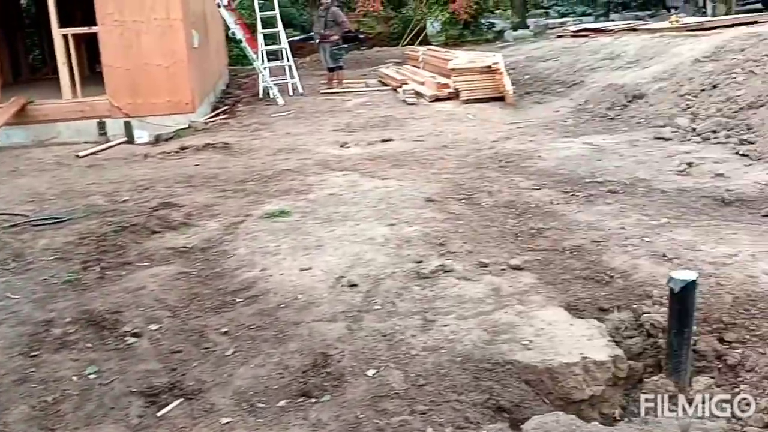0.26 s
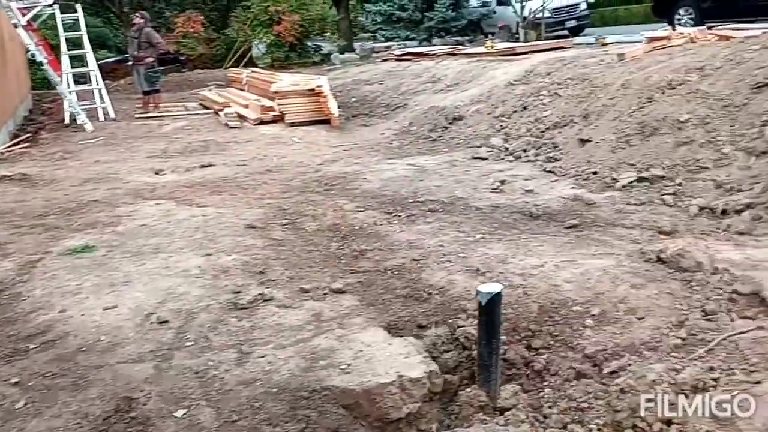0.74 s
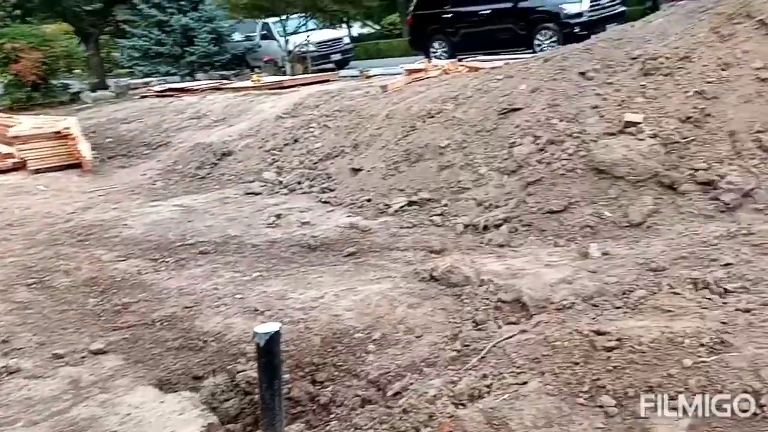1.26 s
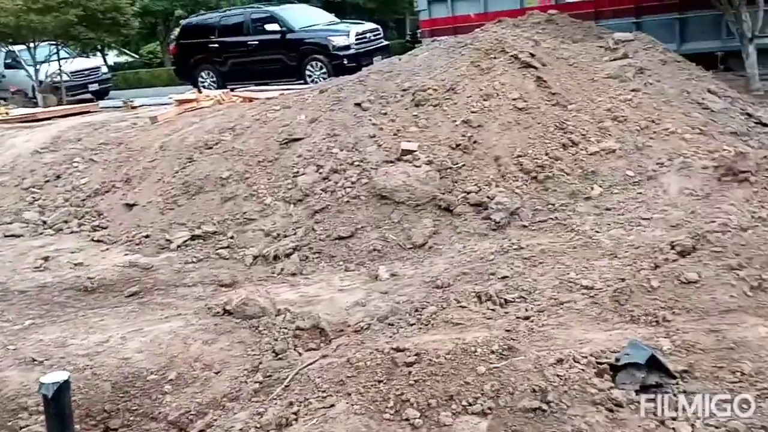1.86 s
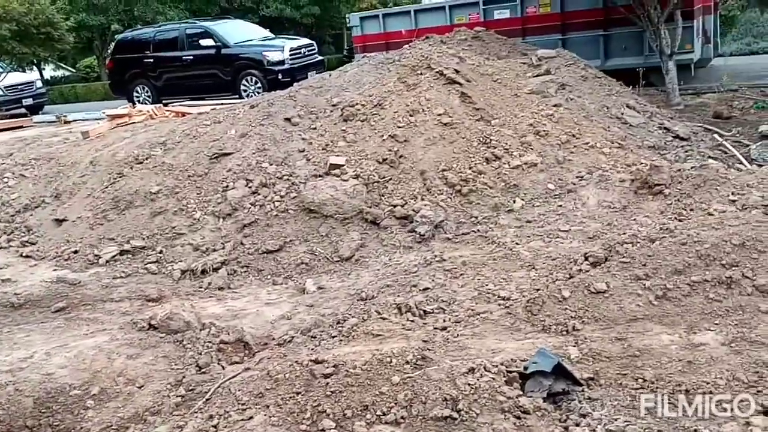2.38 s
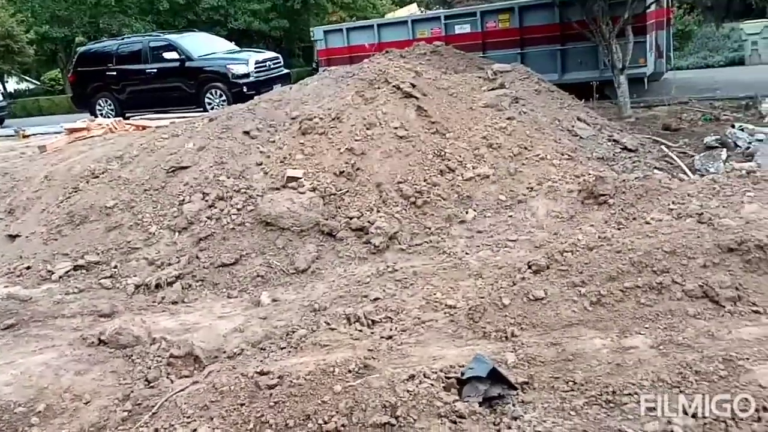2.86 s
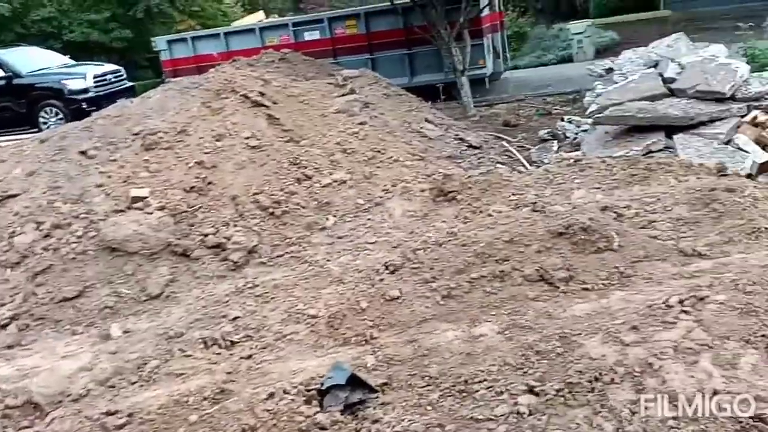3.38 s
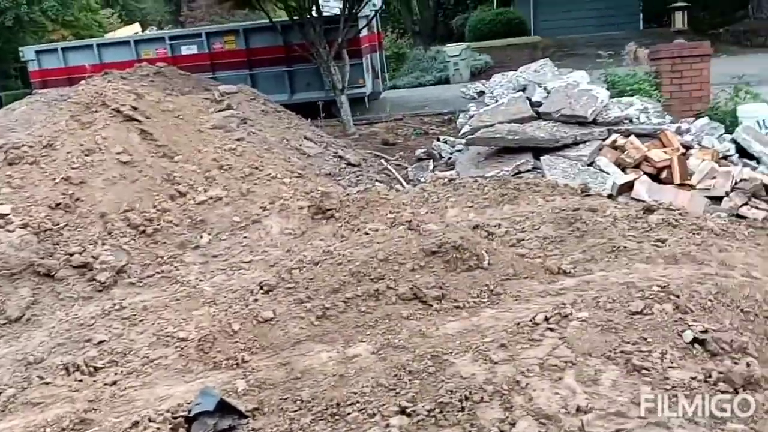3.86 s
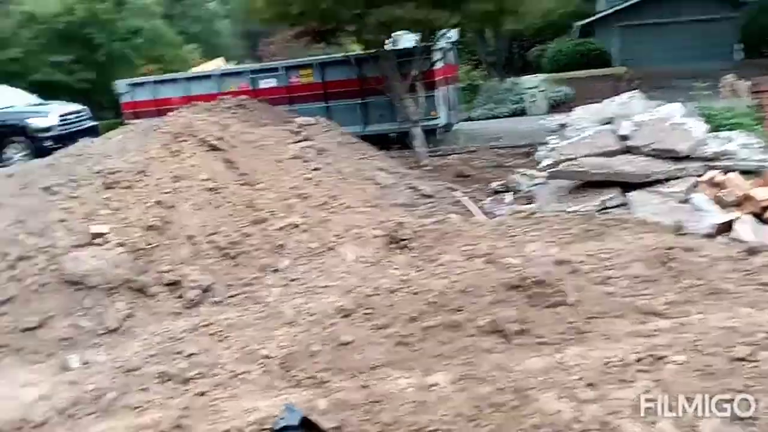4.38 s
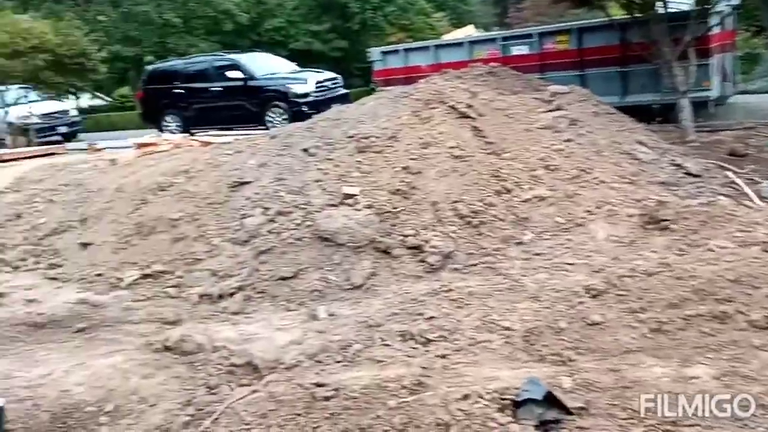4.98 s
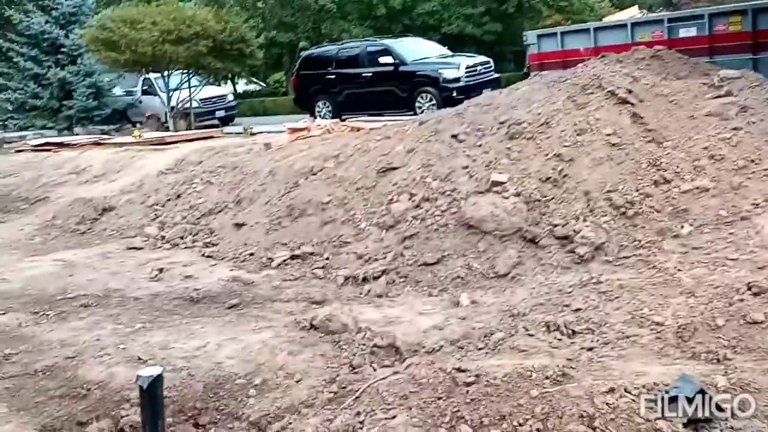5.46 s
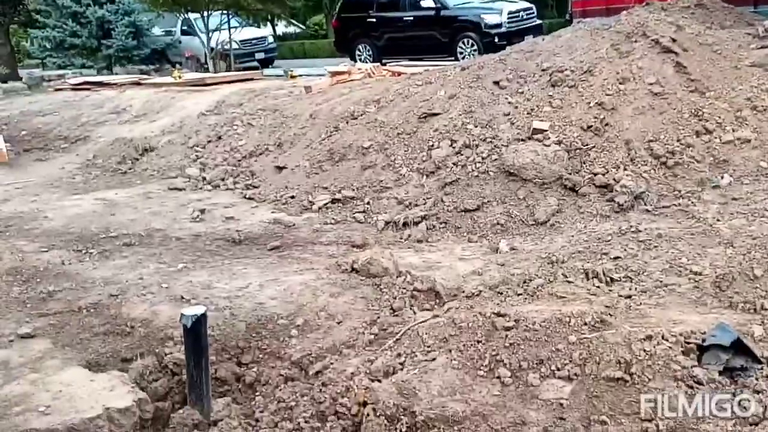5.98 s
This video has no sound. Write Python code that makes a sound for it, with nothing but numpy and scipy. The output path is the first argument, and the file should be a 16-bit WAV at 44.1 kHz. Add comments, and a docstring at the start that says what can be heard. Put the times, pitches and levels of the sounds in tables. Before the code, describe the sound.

Two sharp nail gun shots ring across an outdoor work site, with a board slam, tool knocks, hollow rubbing and faint squeaks around them.

```python
"""An open building site, heard through a hand-held phone: a nail gun fires twice, a ring of decaying
tones under a rising snap. Tools knock and boards thud off to the right as bursts of banded noise, and
walls and trees send each blow back as a long wash. Behind them lie a wavering noise bed, dry rustles,
a rubbed hollow body (noise through a resonance) and faint squeaks (rough gliding tones).
Fingers tick and bump on the phone: short falling chirps and soft low swings."""
import sys
import numpy as np
from scipy import signal
from scipy.fft import rfft, irfft, next_fast_len
from scipy.io import wavfile
from scipy.ndimage import uniform_filter1d

SR = 44100
rng = np.random.default_rng(int(sys.argv[2]) if len(sys.argv) > 2 else 0)


def wav_out(sig):
    """Save sig, one row per channel (or a flat mono array), as 16-bit PCM at SR to the path in sys.argv[1]."""
    wavfile.write(sys.argv[1], SR, np.round(np.clip(np.atleast_2d(sig).T, -1, 1) * 32767).astype(np.int16))


N = 274743
LAG_S = 23 / SR  # the left port hears the site later


def undb(db):
    """Decibels to amplitude."""
    return 10 ** (np.asarray(db) / 20)


def along(hz, table):
    """Columns of a table read on a log-frequency axis."""
    rows = np.array(table, float)
    return [np.interp(np.log(hz), np.log(rows[:, 0]), column) for column in rows.T[1:]]


def walk(rate, size=N):
    """Random levels held for 1 / rate s and smoothed twice; spread 1."""
    hold = int(SR / rate)
    steps = np.repeat(rng.standard_normal(size // hold + 8), hold)
    smooth = uniform_filter1d(uniform_filter1d(steps, hold), hold)
    return smooth[:size] / smooth.std()


def ring_modes(t, modes, turns):
    """Sum of decaying sine modes (pitch_hz, level_db, t60_s), each started at its own phase in turns."""
    return sum(undb(db) * np.sin(2 * np.pi * (hz * t + turn)) * 1000 ** (-t / t60)
               for (hz, db, t60), turn in zip(modes, turns))


def add(out, s, sound, pan_db=0., lag_s=0.):
    """Mixes a short sound into both channels; positive pan leans left, the lag delays the left."""
    for c, sign in enumerate((1, -1)):
        i = int((s + lag_s * (1 - c)) * SR)
        out[c, i:i + len(sound)] += sound[:N - i] * undb(sign * pan_db / 2)


# colour of the microphone: pitch_hz [Hz], level_db [dB]
MIC = [(30, -15), (60, -9.5), (110, 1), (250, -3.5), (550, -2.5), (950, 1), (1400, -3), (1900, -1.5),
       (2400, -2), (2750, -5), (3200, -5.5), (3800, -5), (4800, -2.5), (6000, 1.5), (7600, -5.5),
       (9500, -5), (12000, -4.5), (15000, -2)]
RIPPLE_DB, RIPPLE_HZ = 2.5, 24.97  # spread of the ripple, spacing of its knots
PORTS_M = 0.24  # spacing of the ports in the all-round field


def band_noises():
    """Third-octave noise at the two ports, rms 1: a wave that reaches the left late, and a field from all sides."""
    n = next_fast_len(N)
    f = np.fft.rfftfreq(n, 1 / SR) + 1e-3
    mic = undb(along(f, MIC)[0])  # the colour of the microphone also slopes each band
    # a fixed random ripple makes some pitches of all the noise stronger
    knots = np.arange(0, SR / 2 + RIPPLE_HZ, RIPPLE_HZ)
    ripple = np.interp(f, knots, rng.standard_normal(len(knots)))
    mic = mic * undb(RIPPLE_DB * ripple)
    shared, mid, side = rfft(rng.standard_normal((3, n)))
    wave = np.array([shared * np.exp(-2j * np.pi * f * LAG_S), shared])
    alike = np.sinc(2 * f * PORTS_M / 343)  # long waves are the same at both ports
    mid, side = mid * np.sqrt(1 + alike), side * np.sqrt(1 - alike)
    field = np.array([mid + side, mid - side])
    for hz in 23.5 * 2 ** np.arange(0, 9.5, 1 / 3):
        mask = np.cos(np.pi / 2 * np.clip(3 * np.log2(f / hz), -1, 1)) * mic
        late = irfft(mask * wave, n)[:, :N]
        loose = irfft(mask * field, n)[:, :N]
        yield hz, late / late.std(), loose / loose.std()


# spectrum of the distant noise: pitch_hz [Hz], density_db [dB per Hz, relative]
SITE = [(15, -39), (25, -6), (120, -6.5), (451, -17), (840, -5.5), (1480, -11.5), (1700, -10),
        (2910, -21.5), (5730, -28), (8140, -40.5), (13600, -48.5), (14800, -40), (16000, -41.5)]
# swells of the distant noise: time_s [s], bass_db [dB], treble_db [dB]
BUSTLE = [(0, -60.5, -58.5), (.3, -57.5, -61.5), (.7, -62, -56.5), (1.1, -46.5, -60), (1.4, -59.5, -64),
          (1.8, -48, -59), (2.1, -60, -60.5), (3.3, -58.5, -59), (4.5, -60, -61.5), (4.851, -54, -61.5),
          (5.1, -61, -65), (5.45, -56, -57.5), (5.75, -57.5, -60.5), (6.0, -60, -64.5), (6.23, -55.5, -63)]


def bustle(hz):
    """Level of the distant noise in one band: slow swells with a quick random waver."""
    s, bass_db, treble_db = np.transpose(BUSTLE)
    treble = np.clip(np.log2(hz / 300) / 1.1, 0, 1)
    swell = np.interp(np.arange(N) / SR, s, bass_db + treble * (treble_db - bass_db))
    band_db = along(hz, SITE)[0] + 10 * np.log10(hz / 1260)  # wider bands hold more noise
    return undb(band_db + swell + 4.1 * walk(22))


# dry rustles: start_s [s], length_s [s], level_db [dB], centre_hz [Hz], width_oct [octaves]
RUSTLES = [(0.11, 0.46, -69.5, 6420, 0.13), (5.09, 0.4, -60.5, 785, 0.25), (5.4, 1, -66, 860, 0.16),
           (5.503, 0.17, -67, 2170, 0.65)]


def rustles(hz, floor):
    """Arched bursts of noise around a centre pitch, added in power to the level of the band."""
    t = np.arange(N) / SR
    for s, length, db, centre_hz, octaves in RUSTLES:
        arch = np.sin(np.pi * np.clip((t - s) / length, 0, 1)) ** .5
        floor = np.hypot(floor, undb(db) * arch * np.exp(-(np.log2(hz / centre_hz) / octaves) ** 2))
    return floor


# something hollow dragged or rubbed: start_s [s], length_s [s], start_db [dB], end_db [dB]
STROKES = [(0.248, 0.073, -56, -69), (0.37, 0.31, -47, -55), (0.721, 0.11, -56, -56),
           (0.888, 0.19, -66, -54), (1.965, 0.14, -51, -42.5), (2.162, 0.3, -57, -53),
           (3.157, 0.24, -61, -46.5), (3.398, 0.12, -51.5, -46), (3.595, .06, -44, -50),
           (4.72, 0.11, -54.5, -55.5), (5.009, .08, -50.5, -65), (5.58, 0.049, -53, -61)]
STROKE_ATTACK_S, STROKE_RELEASE_S = 0.031, 0.11
HOLLOW_HZ, HOLLOW_WIDTH_HZ = 337, 71


def hollow_rub(out):
    """Uneven slips shake a hollow body that rings for a few cycles."""
    t = np.arange(N) / SR
    slips = rng.standard_normal(N) * undb(1.6 * walk(65))
    edges = [HOLLOW_HZ - HOLLOW_WIDTH_HZ / 2, HOLLOW_HZ + HOLLOW_WIDTH_HZ / 2]
    body = signal.sosfilt(signal.butter(2, edges, "band", fs=SR, output="sos"), slips)
    power = np.zeros(N)
    for s, length, start_db, end_db in STROKES:
        attack = (t - s) / STROKE_ATTACK_S
        release = 1 + (s + length - t) / STROKE_RELEASE_S
        press = np.clip(np.minimum(attack, release), 0, 1)
        power += (press * undb(np.interp(t, [s, s + length], [start_db, end_db]))) ** 2
    add(out, 0, np.sqrt(power) * body / body.std(), .6, 0.45 * LAG_S)


# a squeak that returns about twice a second: start_s [s], level_db [dB], upper_strand_db [dB]
SQUEAKS = [(0.06, -51, -69.5), (0.615, -48, -64.5), (1.17, -48, -67.5), (1.759, -46, -68.5)]
# glide of that squeak: length_s [s], start_hz [Hz], end_hz [Hz]
SQUEAK = (0.077, 1390, 1330)
STRAND = (0.14, 1800, 1900)  # its upper strand, same columns
STRAND_LATE_S = 0.064
# lone squeaks: start_s [s], level_db [dB], length_s [s], start_hz [Hz], end_hz [Hz]
STRAYS = [(0.108, -64.5, 0.12, 560, 558), (0.186, -57.5, 0.096, 1385, 1347),
          (0.295, -66, 0.046, 1630, 1960), (0.315, -55, 0.12, 2015, 1990), (0.376, -55, 0.16, 1910, 1555),
          (1.3, -54.5, 0.056, 1573, 1390), (1.391, -70, 0.17, 2285, 2650), (1.599, -59.5, 0.2, 2460, 2400),
          (1.853, -63, 0.049, 2930, 3440), (1.886, -55.5, 0.038, 1515, 1465),
          (1.869, -68, 0.18, 3440, 3270), (4.335, -54, 0.049, 3540, 3290),
          (4.373, -63.5, 0.036, 2930, 3080)]
# a thin steady tone: start_s [s], level_db [dB], length_s [s]
PINGS = [(5.374, -54, 0.11), (5.801, -70, 0.22)]
PING_HZ = 2417
SQUEAK_WOBBLE_HZ, STRAND_WOBBLE_HZ, PING_WOBBLE_HZ = 28, 70, 4
BREATH_HZ = 30  # wobble at which the breathy part is as big as the tone
BREATH_PER_S = 300  # changes of the breathy part per second
SQUEAK_ECHO_DB, STRAY_ECHO_DB, PING_ECHO_DB, SQUEAK_T60_S = -35.5, -37, -38.5, 0.52


def squeaks(out):
    """Short rough whistles from afar, smeared by the echo of the site, a decaying noise tail."""
    t = np.arange(SR // 2) / SR
    calls = [(s, db, *SQUEAK, SQUEAK_WOBBLE_HZ, SQUEAK_ECHO_DB) for s, db, _ in SQUEAKS]
    calls += [(s + STRAND_LATE_S, db, *STRAND, STRAND_WOBBLE_HZ, SQUEAK_ECHO_DB) for s, _, db in SQUEAKS]
    calls += [(*row, SQUEAK_WOBBLE_HZ, STRAY_ECHO_DB) for row in STRAYS]
    calls += [(*row, PING_HZ, PING_HZ, PING_WOBBLE_HZ, PING_ECHO_DB) for row in PINGS]
    for s, db, length, hz0, hz1, wobble, echo_db in calls:
        u = np.linspace(0, 1, int(length * SR))
        hz = hz0 + (hz1 - hz0) * u + wobble * walk(139, size=len(u))
        blur = walk(BREATH_PER_S, size=len(u)) + 1j * walk(BREATH_PER_S, size=len(u))
        breath = 1 + wobble / BREATH_HZ * blur  # spreads the line
        whistle = np.imag(breath * np.exp(2j * np.pi * np.cumsum(hz) / SR))
        tone = np.sin(np.pi * u ** 0.6) * undb(db) * whistle
        add(out, s, tone, 2.2, LAG_S)
        i = int(s * SR)
        for c in range(2):
            wash = rng.standard_normal(len(t)) * 1000 ** (-t / SQUEAK_T60_S)
            tail = signal.fftconvolve(tone, wash)
            out[c, i:][:len(tail)] += undb(echo_db) * tail[:N - i]


# finger ticks on the case: start_s [s], level_db [dB], start_hz [Hz], end_hz [Hz], cycles [count],
# left_minus_right_db [dB], ring_db [dB against the tick]
TICKS = [(3.0205, -24, 1500, 340, 1.4, 1.5, -36), (5.205, -42, 5750, 3460, 7.5, -10, -10),
         (5.323, -21.5, 2570, 920, 2.33, 15, -16), (5.358, -38.5, 3060, 1210, 2.2, 12, -3.5),
         (5.366, -41, 1400, 700, 2.1, 30, -22), (6.043, -54, 2280, 1390, 7.4, 2, -20),
         (6.063, -54, 1900, 1450, 7.8, 7.5, -18)]
# modes of the case: pitch_hz [Hz], level_db [dB], t60_s [s]
CASE = [(1090, 11.5, 0.0075), (1790, 7, 0.012), (2380, 1, 0.012), (2890, 0.5, 0.012), (4340, -18, 0.0088),
        (6730, 6.5, 0.0032)]


def finger_ticks(out):
    """A few cycles that drop in pitch, grit, and a short ring of the case."""
    t = np.arange(SR // 30) / SR
    for s, db, hz0, hz1, cycles, pan, ring_db in TICKS:
        u = np.linspace(0, 1, int(cycles * SR / np.sqrt(hz0 * hz1)))
        swing = np.sin(2 * np.pi * np.cumsum(hz0 * (hz1 / hz0) ** u) / SR)
        grit = 0.22 * undb(ring_db) * rng.standard_normal(len(u)) * np.exp(-u / 0.23)
        add(out, s, undb(db) * (np.sin(np.pi * u ** 0.66) ** 2 * swing + grit), pan)
        ring = ring_modes(t, CASE, rng.random(len(CASE)))
        add(out, s, undb(db + ring_db) * ring * (1 - np.exp(-t / 0.00021)), pan)


# hand bumps: start_s [s], level_db [dB], pitch_hz [Hz], left_minus_right_db [dB]
BUMPS = [(3.183, -47, 84, 4.5), (4.698, -46.5, 79, -26.5), (4.73, -36.5, 91, -34), (4.755, -35, 122, -21.5),
         (4.858, -53, 147, -16), (4.874, -43, 103.5, 8), (4.919, -57.5, 78.1, 18.5),
         (5.255, -49.5, 95, -22), (5.28, -57, 114, -16), (5.431, -49, 119, -14), (5.605, -52, 84, -34),
         (5.649, -45.5, 112, -29), (5.85, -69, 137.4, -3.5)]


def hand_bumps(out):
    """A soft low swing of 2.2 cycles under a rounded envelope."""
    for s, db, hz, pan in BUMPS:
        length = 2.2 * SR / hz
        u = np.arange(int(length)) / length
        add(out, s, -undb(db) * np.sin(np.pi * u) ** 2 * np.sin(2 * np.pi * 2.2 * u), pan)


# far blows, one table per kind: start_s [s], crack_db [dB at 1.7 kHz, before the colour of the kind],
# tilt_db [dB per octave], echo_db [dB], left_minus_right_db [dB]
SLAMS = [(1.554, -36.5, 0, -9, 0)]
# modes of the board: pitch_hz [Hz], level_db [dB], t60_s [s]
BOARD = [(103.5, 2, 0.22), (164, 0, 0.23), (213.5, -4, 0.49), (269, -6.5, 0.45), (308, -5, .3),
         (610, -9, 0.19), (835, -11, .1)]
BOARD_DB, BOUNCE_S, BOUNCE_DB = -29.5, .033, -2  # the slammed board lands twice


def board(out):
    """A slammed board knocks twice and rings low."""
    t = np.arange(SR // 2) / SR
    for s, *_ in SLAMS:
        for late_s, db in ((0, BOARD_DB), (BOUNCE_S, BOARD_DB + BOUNCE_DB)):
            ring = ring_modes(t, BOARD, rng.random(len(BOARD)))
            add(out, s + late_s, undb(db) * ring * (1 - np.exp(-t / 0.0021)), 0., LAG_S)


# the other kinds of far sound, same columns as SLAMS
NAILS = [(2.4405, -14, -0.5, -7.5, 0.5), (3.677, -12, -0.84, -10, -0.5)]
# noise that swells up just before a blow, same columns
SWELLS = [(2.104, -49, -1.5, -6.5, 0), (2.422, -29.5, 0.29, -4.5, 0), (3.375, -45.5, -0.59, -10.5, 0.0032)]
# presses, clinks, thuds and knocks, same columns
PRESSES = [(2.122, -36.5, -1, -13, 1.5), (3.395, -35, -1.5, -21, -1), (5.356, -54.5, 2.5, -22, -2)]
CLINKS = [(1.556, -67.5, 3.5, -9.5, 2), (2.171, -38.5, -3, -15, -2), (3.501, -46.5, -1.5, -25, -1),
          (3.658, -40.5, -2, -14, 0.5), (4.86, -71, -1.5, -8, 5), (5.139, -63.5, 0.5, -8, -17.5)]
THUDS = [(.909, -60.5, -3, -5, 0), (1.13, -94, -8, -10.5, 0), (1.29, -73.5, -4, -39, 0.0044),
         (3.46, -73, -4, -7.5, 0), (3.885, -56, -4, -18, 0)]
KNOCKS = [(.455, -48, 2.5, 3, 4.5), (.825, -58, -4.5, -10.5, 24), (.955, -60, 9, 9, 2.5),
          (2.123, -44, 7, -1.5, 4), (2.4305, -36, -10, -33, 20.5), (3.397, -38, -4, -15, 1),
          (3.503, -46, 2, -8, 1), (5.184, -37.5, 3, -13, 1.5), (5.209, -44.5, -4, -7.5, 0),
          (5.919, -61.5, 9.5, -9.5, 12), (6.174, -63, 3, -12, -2.5)]
# pitches at which the colour of a kind is given: pitch_hz [Hz]
BLOW_HZ = [55, 130, 500, 1700, 4500, 12000]
# what a kind shares: blows [table], colour_db [dB at BLOW_HZ], rise_s [s, lengthened in the bass],
# crack_t60_s [s, lengthened in the bass], echo_length [share of full]
KINDS = [
    (NAILS, (-30, -32, -14.5, 1, -4.5, -13), 0.0043, 0.073, 0.97),
    (SWELLS, (-27, -29, -2.5, -0.5, 9, 0), .045, 0.06, 0.52),
    (PRESSES, (-23, -23, -7.5, -1.5, 0.5, -5.5), 0.0018, 0.048, 0.59),
    (CLINKS, (-8.5, -10.5, -5.5, 0.5, 16.5, -16.5), 0.00082, 0.034, 0.44),
    (THUDS, (-3, 11, 1.5, 3, -19, -23), 0.003, 0.13, 0.53),
    (SLAMS, (-10, -1, 2.5, -5, -25, -40), 0.0015, 0.14, 0.53),
    (KNOCKS, (-40.5, -48, -21.5, 2, -15, -57.5), 0.0026, 0.061, 0.41),
]
# echo of the site at full length: pitch_hz [Hz], level_db [dB], hold_s [s], t60_s [s]
ECHO = [(49, -10.5, 0.59, 1.4), (137, 9.5, 0.18, 1.1), (250, 3, 0.3, 0.74), (393, 3.5, 0.25, 0.83),
        (560, 2.5, 0.28, 0.97), (810, -4.5, 0.21, 0.85), (1030, -4.5, 0.29, 1.026), (1610, -2, 0.22, 1.094),
        (2860, -4.5, 0.15, 1.12), (4066, -5.5, 0.13, 1.02), (6600, -1, 0.1, 0.75), (11300, -1.5, 0.2, 0.19)]
ECHO_RISE_S = 0.034  # at full length, slower in the bass
TILT_HZ = 1700  # pivot of the tilt
HOP = 32  # samples per envelope step


def blows(hz):
    """Envelopes in one band: the dry cracks and swells, and their echoes that build, hold and die away."""
    t = np.arange(N // HOP + 1) * HOP / SR
    echo_db, full_hold, t60 = along(hz, ECHO)
    mic_db = along(hz, MIC)[0]
    dry, wet = np.zeros((2, 2, len(t)))  # powers
    for rows, colour, rise, crack, share in KINDS:
        colour_db = mic_db + np.interp(np.log(hz), np.log(BLOW_HZ), colour)
        hold = full_hold * share ** 2  # small blows wake only the near walls
        for s, db, tilt, send_db, pan in rows:
            sides_db = pan * np.array([[.5], [-.5]])
            gain = undb(db + colour_db + tilt * np.log2(hz / TILT_HZ) + sides_db)
            age = np.maximum(t - s, 0)
            # low tones start slower and ring longer
            onset = (1 - np.exp(-age / (rise + 1.5 / hz))) ** 2
            dry += (gain * onset * 1000 ** (-age / (crack + 12 / hz))) ** 2
            build = 1 - np.exp(-(age / (ECHO_RISE_S * share + 4 / hz)) ** 2)
            past = np.cbrt(age ** 3 + hold ** 3) - hold  # stays near zero during the hold
            wet += (gain * undb(send_db + echo_db) * build * 1000 ** (-past / (t60 * share))) ** 2
    full_t = np.arange(N) / SR
    return [np.array([np.interp(full_t, t, np.sqrt(side)) for side in power]) for power in (dry, wet)]


# wash from the side of the work: pitch_hz [Hz], share [0 to 1, of the power]
AIMED = [(200, 0.55), (700, 0.41), (1200, 0.44), (2400, 0.23), (4500, 0.12), (9000, 0.068)]
WAVER_DB, SURGE_DB, CLATTER_DB, CLATTER_PER_S = 1.2, 0.6, 0.89, 350


def site():
    """Blows, echoes, rustles and the wavering background, built from noise band by band."""
    out = np.zeros((2, N))
    lumps = SURGE_DB * walk(30) + CLATTER_DB * walk(CLATTER_PER_S)  # slow and fast waver shared by all bands
    for hz, late, loose in band_noises():
        dry, wet = blows(hz)
        floor = rustles(hz, bustle(hz))
        wavering = wet * undb(WAVER_DB * walk(30) + lumps)  # each band of the wash wavers at random
        aimed = np.clip(along(hz, AIMED)[0], 0, 1)
        wash = np.sqrt(aimed) * late + np.sqrt(1 - aimed) * loose
        sound = dry * late + np.hypot(wavering, floor) * wash
        # the hand shades the treble on the right
        shade_db = np.clip(np.log2(hz / 500), 0, 1) * np.array([[1.2], [-1.2]])
        out += sound * undb(shade_db)
    return out


# shots and presses that ring the nail gun: start_s [s], level_db [dB], snap_db [dB against the ring]
SHOTS = [(2.122, -23, 2.5), (2.1710, -29.5, 19.5), (2.4421, -6, 6.5), (3.397, -31.5, -10.5),
         (3.682, -5.5, -6)]
# modes of the tool body: pitch_hz [Hz], level_db [dB], t60_s [s]
GUN = [(376, -9, 0.045), (1600, -18, .045), (2045, -6.5, 0.028), (3160, -9.5, 0.019), (4400, -5.5, 0.045),
       (4960, -7.5, 0.043), (4810, -15, 0.036), (6940, -6, 0.041)]
SNAP_HZ, SNAP_S = [2440, 6400], 0.0034  # start and end pitch, length


def nail_gun(out):
    """Each shot or press rings the body of the tool under a crack that rises in pitch."""
    t = np.arange(SR // 8) / SR
    sweep = np.sin(2 * np.pi * np.cumsum(np.interp(t, [0, SNAP_S], SNAP_HZ)) / SR)
    snap = sweep * np.sin(np.pi * np.minimum(t / SNAP_S, 1)) ** 2  # the driver hits home
    for s, db, snap_db in SHOTS:
        ring = ring_modes(t, GUN, rng.random(len(GUN)))
        shot = (ring + undb(snap_db) * snap) * (1 - np.exp(-t / 0.0019))
        add(out, s, undb(db) * shot, 2.2, LAG_S)


def scene():
    """Everything at the two ports."""
    out = site()
    for add_source in (hollow_rub, squeaks, finger_ticks, hand_bumps, board, nail_gun):
        add_source(out)
    return out


TOP_HZ = 16350


def record(dry):
    """The phone drops the deepest bass, rounds the loudest peaks and cuts the top."""
    lean = signal.sosfilt(signal.butter(3, 58, "high", fs=SR, output="sos"), dry)
    rounded = np.tanh(0.62 * lean) / 0.57
    return signal.sosfilt(signal.ellip(10, .2, 60, TOP_HZ, fs=SR, output="sos"), rounded)


dry = scene()
out = record(dry)
wav_out(out)
```